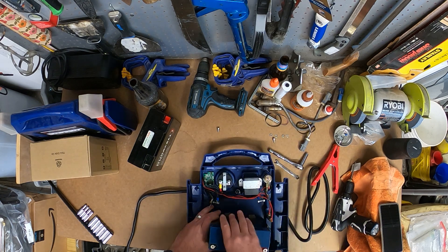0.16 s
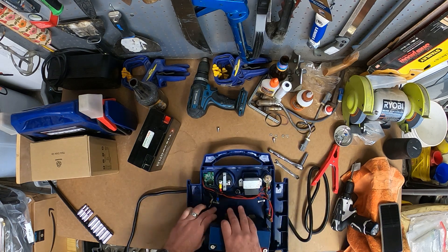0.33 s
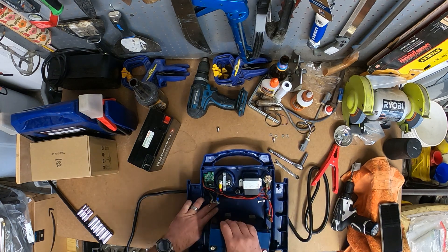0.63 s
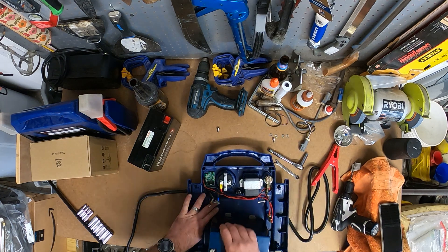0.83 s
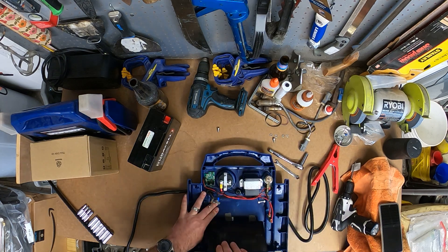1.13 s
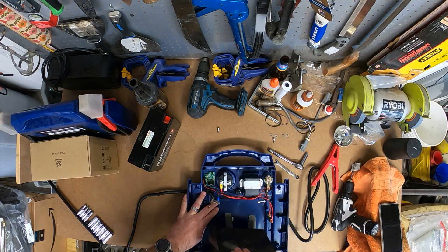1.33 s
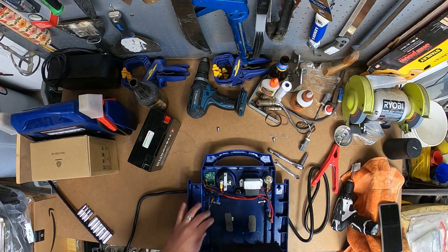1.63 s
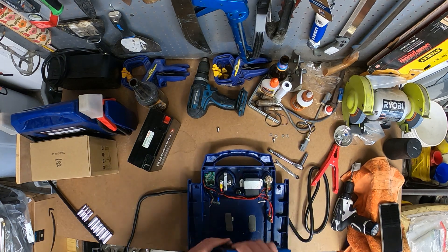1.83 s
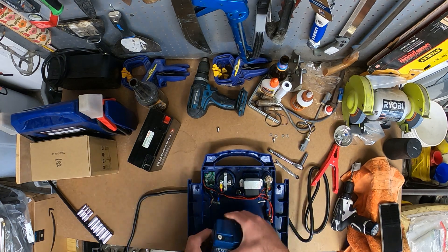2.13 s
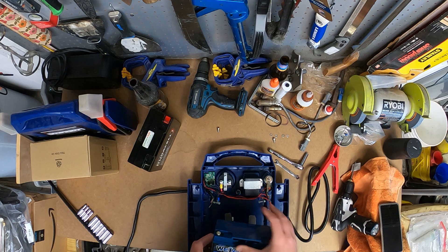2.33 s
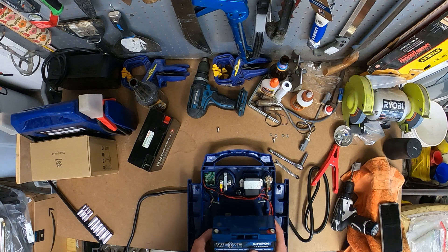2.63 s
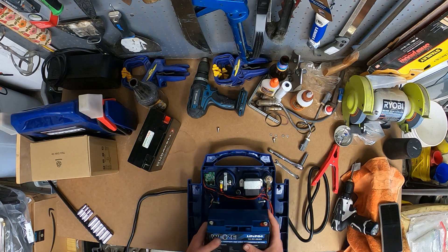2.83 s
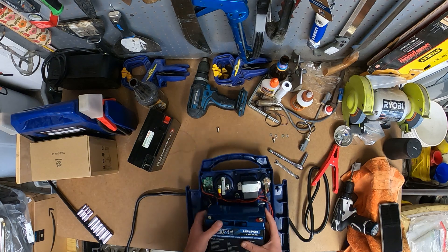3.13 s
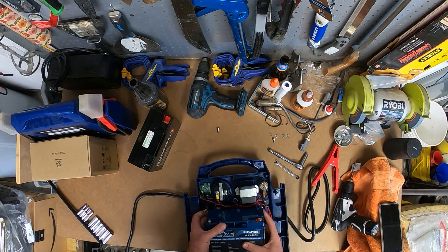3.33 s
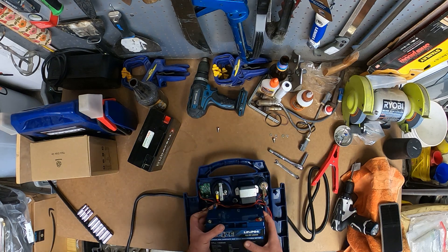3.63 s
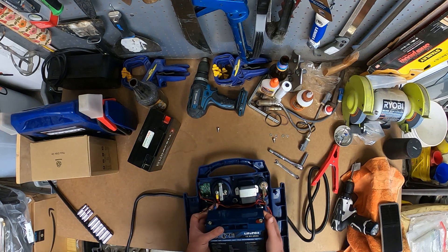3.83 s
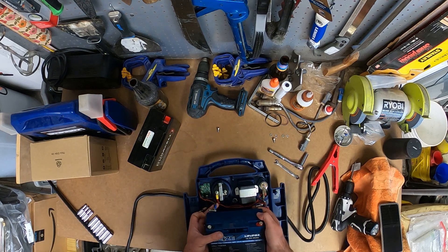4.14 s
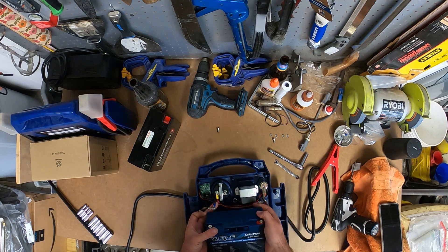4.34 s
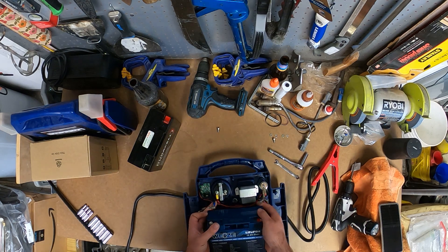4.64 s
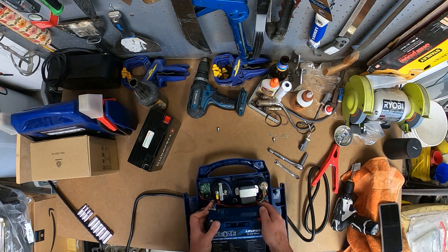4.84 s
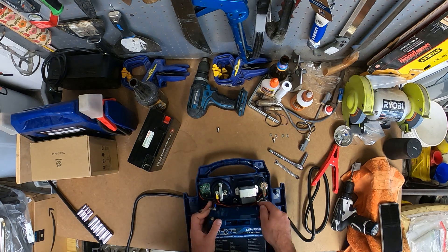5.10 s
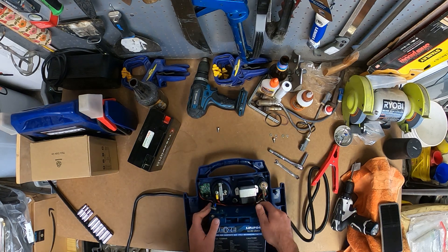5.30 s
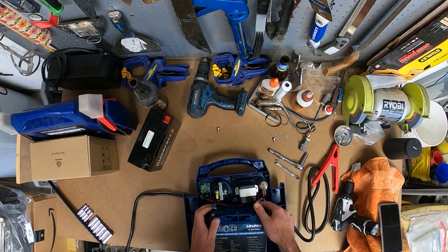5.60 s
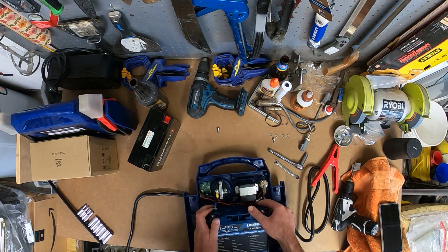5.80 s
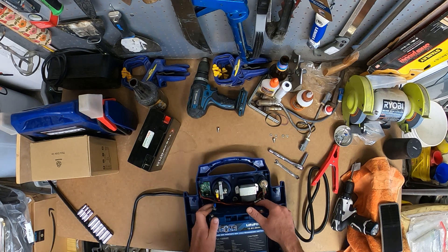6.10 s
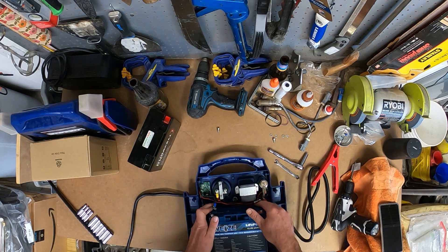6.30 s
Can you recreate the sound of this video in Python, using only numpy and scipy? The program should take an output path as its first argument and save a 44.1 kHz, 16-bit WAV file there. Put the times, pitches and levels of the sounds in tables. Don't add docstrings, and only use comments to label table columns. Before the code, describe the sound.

A close stereo camera microphone over a garage workbench, with very faint room tone and a short, small echo. Fingers pat and rub a hollow plastic case, scuffing at about 0.15 s; a brief squeaky slide chirps near 0.38. Light taps at 0.65 lead into a thin creak and groan, then a very loud hard plastic snap at 0.93 with two quick bounces, a low bench thump and a rubbing tail to about 1.1. It falls quiet, with faint skin rubbing, small ticks and a weak drag around 2.1 to 2.3. At 3.0 the battery clunks, then knocks hard and hollow at 3.28, booming in the bench. Clicks and scuffs continue from 3.4 to 4.6, with a scrape and knock at 4.24. Small clips snap at 4.84 and, brighter, at 5.38 with a brief shiver. Soft fumbling leads to a knock at 5.97 and a last dull one at 6.41.

```python
import sys
import numpy as np
from scipy import signal
from scipy.fft import rfft, irfft, next_fast_len
from scipy.io import wavfile
from scipy.ndimage import map_coordinates

SR = 44100
rng = np.random.default_rng(int(sys.argv[2]) if len(sys.argv) > 2 else 0)


def materialize(psi):
    bounded = np.clip(np.atleast_2d(psi).T, -1, 1)
    quanta = np.round(bounded * 32767).astype(np.int16)
    wavfile.write(sys.argv[1], SR, quanta)


def natural_amplitude(level_db):
    exponent = np.asarray(level_db, float) / 20
    return 10 ** exponent


N = 284886

# [f/Hz, width/Hz, level/dB]
WALL_MODES = [(600, 600, -1.5), (866, 410, 5.5), (1290, 510, 4)]
# [f/Hz, width/Hz, level/dB]
RIB_MODES = [(1790, 740, 1), (2650, 1300, -1), (3342, 1200, -6.5), (4360, 950, -7)]
# [f/Hz, width/Hz, level/dB]
EDGE_MODES = [(5400, 210, -2.5), (7156, 2700, -3.5), (9500, 2200, -7.5), (13300, 3000, -9)]
# [f/Hz, width/Hz, level/dB]
HOLLOW_MODES = [(149.7, 12, -4.5), (215, 28, 1.5), (370, 44, -9.5), (594.5, 32, -9)]


def unit(x):
    return x / np.sqrt(np.mean(x ** 2) + 1e-20)


def peak(x):
    return x / np.abs(x).max()


def add(track, s, x):
    part = track[..., round(s * SR):][..., :x.shape[-1]]
    part += x[..., :part.shape[-1]]


def along(points, hz):
    f, v = np.transpose(points)
    return np.interp(np.log(hz + 1), np.log(f + 1), v)


def filtered(x, response):
    m = next_fast_len(x.shape[-1] + 2048, real=True)
    return irfft(rfft(x, m) * response(np.fft.rfftfreq(m, 1 / SR)), m)[..., :x.shape[-1]]


def body(modes):
    def response(f):
        total = 0
        for k, (c, w, db) in enumerate(modes):
            total = total + (-1) ** k * natural_amplitude(db) * 1j * f * w / (c * c - f * f + 1j * f * w)
        return total
    return response


def dense(modes):
    def response(f):
        power = 0
        for c, w, db in modes:
            power = power + natural_amplitude(2 * db) * ((f * w) ** 2 / ((c * c - f * f) ** 2 + (f * w) ** 2)) ** 2
        cepstrum = irfft(np.log(power + 1e-12) / 2)
        cepstrum[1:len(f) - 1] *= 2
        cepstrum[len(f):] = 0
        return np.exp(rfft(cepstrum))
    return response


def shaken(modes, spread_db):
    shifts = spread_db * rng.standard_normal(len(modes))
    return [(c, w, db + shift) for (c, w, db), shift in zip(modes, shifts)]


def widened(modes, by):
    return [(c, w * by, db) for c, w, db in modes]


def wobble(rate):
    return map_coordinates(rng.standard_normal(int(N * rate / SR) + 4), [np.arange(N) * rate / SR], order=1)


def gritty(grit_db, rate):
    strength = natural_amplitude(grit_db * (wobble(rate) + 0.4 * wobble(rate / 1.1)))
    return unit(strength * rng.standard_normal((2, N)))


def spread(pair):
    # [f/Hz, likeness/1]
    likeness = [(60, 0.95), (130, 0.82), (200, 0.65), (550, 0.16), (1650, 0.21), (4970, 0.54),
                (15000, 0.02)]

    def middle_and_side(hz):
        turn = np.arccos(np.clip(along(likeness, hz), -1, 1)) / 2
        return np.array([np.cos(turn), np.sin(turn)])
    mid, side = filtered(pair, middle_and_side)
    return np.array([mid + side, mid - side])


def contacts():
    # [t/s, peak/dB, f/Hz, treble/dB, wall/dB]
    catches = [
        (0.9319, -3.5, 2500, -10, -8),
        (0.952, -8.5, 3600, -16, -8),
        (0.9642, -6.5, 2810, -19, -10),
        (4.8405, -26, 3400, -2, -8),
        (5.3765, -23, 4300, -16, -9),
    ]
    # [t/s, peak/dB, f/Hz, treble/dB]
    ticks = [(0.0789, -41, 3430, -11), (0.643, -39.5, 2800, -10), (1.6187, -59.5, 3540, -6),
             (1.6734, -55.5, 1549, -7), (1.8943, -64.5, 4410, 1.5), (1.9487, -59, 1490, -14),
             (1.969, -56, 1934, -16), (2.813, -59.5, 4280, -12.5), (2.955, -49.5, 3500, -18),
             (3.309, -26, 1380, -41), (3.4749, -31.5, 1540, -13.5), (3.532, -29.5, 2600, -20),
             (3.5747, -40.5, 3080, -6.5), (3.7264, -42, 2350, -10), (3.881, -44.5, 2500, -28),
             (3.9597, -45, 2830, -20), (4.069, -56, 2120, 1.5), (4.304, -45, 2650, -13),
             (4.36, -49.5, 2920, -12), (4.4206, -51, 4570, -8), (4.842, -35, 3300, 2),
             (5.5883, -45.5, 4320, -33.5), (5.683, -46, 2740, -18.5), (5.8893, -38.5, 2980, -8),
             (5.964, -23, 2000, -23), (6.0459, -37, 1410, -19.5)]
    # [t/s, peak/dB, f/Hz, treble/dB, wall/dB]
    scuffs = [(0.1365, -41.5, 2400, -22, -15), (0.15, -37, 2500, -13, -3.5), (0.161, -34, 1740, -10, -4),
              (0.651, -36.5, 1790, -9, -1), (0.7707, -45.5, 1654, -16.5, -5), (2.0845, -51, 1830, -7.5, -9),
              (2.166, -48, 1505, -24.5, -23), (2.2467, -48, 1500, -4, -19), (3.0259, -29.5, 1416, -26, 1),
              (3.263, -25.5, 2600, -30, -1.5), (3.5982, -32.5, 2050, -19.5, -17),
              (4.121, -44, 2000, -23.5, -11), (4.2347, -34.5, 2000, -32, -1.5),
              (4.4344, -43.5, 2730, -9, -6.5), (4.7382, -37, 1790, -20, -5.5),
              (4.8767, -38, 2800, -5.5, -2), (4.9507, -45.5, 2630, -38.5, -2.5),
              (5.1505, -42, 1930, -9.5, -1), (5.3672, -32, 2600, -8, -1), (5.3785, -31, 3600, -8, -14),
              (6.107, -40.5, 1460, -19.5, -5.5)]
    # [t/s, peak/dB, treble/dB, wall/dB]
    taps = [(0.0542, -50.5, -24, 6), (2.676, -56.5, -6, 0.5), (2.982, -32, -30, 6.5),
            (3.056, -38.5, -13, 6), (3.279, -16.5, -42, 0), (3.613, -41, -20, 0.5),
            (3.915, -46, -33.5, 0.5), (4.5102, -58.5, -36.5, 16.5), (5.113, -50.5, -19.5, 6),
            (5.257, -48, -22.5, 4), (5.3348, -53.5, -6, 6.5), (5.7708, -61, -26.5, 17),
            (5.9196, -45, -26.5, 10.5), (6.1494, -47.5, -13, 0.5), (6.231, -53, -23, -1.5),
            (6.4129, -28.5, -35, 1)]
    tap_hz, tap_t60_s = 1660, 0.044
    rows = [row + (0.0135,) for row in catches]
    rows += [row + (-8, 0.038) for row in ticks]
    rows += [row + (0.077,) for row in scuffs]
    rows += [(s, db, tap_hz, treble_db, wall_db, tap_t60_s) for s, db, treble_db, wall_db in taps]
    return rows


def clicks():
    spot_db_per_octave = 5.5
    out, t = np.zeros((2, N)), np.arange(SR // 8) / SR
    for s, db, hz, treble_db, wall_db, t60 in contacts():
        t60 = np.clip(t60, .004, .2)
        noise = rng.standard_normal((6, len(t)))
        crack = natural_amplitude(-60 * t / t60) * (1 - np.exp(-t / (0.0079 * t60)))
        rattle = natural_amplitude(-60 * t / (4.2 * t60)) * (1 - t / t[-1])
        shared = crack * (noise[0] + 0.42 * noise[1:3])
        shared = shared + natural_amplitude(-8.5) * rattle * (noise[3] + 0.84 * noise[4:])
        treble = (crack + natural_amplitude(-18.5) * rattle) * (noise[3] + 0.6 * noise[4:])
        spot = [(c, w, g - spot_db_per_octave * abs(np.log2(c / hz))) for c, w, g in RIB_MODES]
        spot.append((hz, 0.19 * hz, 2.5))
        walls = peak(filtered(shared, dense(shaken(WALL_MODES, spread_db=1.5))))
        ribs = peak(filtered(shared, dense(shaken(spot, spread_db=1.5))))
        edges = peak(filtered(treble, dense(shaken(EDGE_MODES, spread_db=1.0))))
        add(out, s, natural_amplitude(db) * (ribs + natural_amplitude(wall_db + 1.5) * walls + natural_amplitude(treble_db + 3.0) * edges))
    return out


def pings():
    # [t/s, peak/dB, f/Hz, t60/s]
    snaps = [(0.9333, -6.5, 2690, 0.0085), (0.9345, -11, 1600, 0.014), (.9525, -17, 1900, 0.0073),
             (0.9373, -16.5, 3460, 0.011), (0.9642, -9, 2814, 0.0082), (.972, -22.5, 2100, 0.06),
             (.997, -28, 2830, 0.029), (1.021, -32, 3030, 0.027), (1.06, -40, 2800, 0.027),
             (1.078, -40, 1230, 0.043), (2.9826, -25, 1504, 0.015), (2.983, -35.5, 3240, .012),
             (2.993, -30.5, 1638, 0.071), (3.0258, -30, 1160, 0.018), (3.0556, -35.5, 900, 0.023),
             (3.0703, -39, 1574, .07), (3.1896, -50, 1140, 0.03), (3.2656, -38, 4260, .015),
             (3.2766, -18, 724, 0.013), (3.2786, -18, 3295, 0.014), (3.2873, -20, 1400, 0.023),
             (3.298, -26.5, 900, .03), (3.321, -29.5, 1375, 0.025), (3.4042, -45, 1740, 0.033),
             (3.4743, -32.5, 3260, 0.0087), (3.4745, -33, 1470, 0.03), (3.5332, -33.5, 2570, 0.0074),
             (3.6002, -31.5, 3180, 0.0068), (3.615, -33, 2960, 0.01), (3.6763, -47, 2340, 0.038),
             (3.711, -49.5, 1290, 0.043), (3.738, -49.5, 4560, .03), (4.204, -46, 1910, .03),
             (4.227, -45, 3270, 0.021), (4.237, -32.5, 2110, 0.016), (4.269, -49, 3600, .02),
             (4.287, -46, 3150, 0.018), (4.556, -53, 1783, 0.07), (4.604, -58, 2500, .02),
             (4.623, -57, 2880, 0.024), (5.377, -17.5, 3600, 0.0083)]
    # [t/s, peak/dB, f/Hz, t60/s]
    rings = [(.9325, -12.5, 5400, 0.0051), (.9318, -10, 800, 0.017), (.9322, -17.5, 8300, 0.0066),
             (.9322, -24, 12800, .003), (.934, -18, 4300, 0.0072), (.9525, -30, 4300, .008),
             (.965, -16, 4440, 0.0068), (.9655, -18.5, 1500, 0.014), (2.091, -48.5, 426, 0.027),
             (3.283, -22, 370.7, 0.13), (3.533, -37.5, 900, .02), (3.616, -42.5, 2074, 0.045),
             (4.545, -50, 294, 0.073), (4.538, -48, 634, .06), (4.56, -49, 547, 0.058),
             (4.238, -36.5, 604, 0.034), (3.533, -45, 1505, 0.034), (3.534, -45, 4400, 0.011),
             (3.475, -41, 5020, 0.01), (3.616, -39, 1294, 0.04), (4.358, -57.5, 4660, 0.13),
             (.934, -20, 560, .05), (4.8408, -25.5, 3290, 0.02), (4.8412, -28.5, 4350, 0.0097),
             (4.841, -37.5, 6730, 0.029), (5.377, -28, 882, 0.054), (5.377, -31, 2710, 0.068),
             (5.3775, -22.5, 4440, 0.017), (5.379, -39, 347, 0.11), (5.267, -40, 1750, 0.027),
             (5.4, -42, 433, 0.051), (5.46, -49.5, 886, 0.064), (5.468, -53.5, 3600, .04),
             (5.68, -51.5, 660, 0.096), (5.753, -50, 2100, 0.034), (5.772, -44.5, 1190, 0.064),
             (5.966, -38, 580, 0.038), (5.966, -32, 1790, 0.052), (6.125, -46, 1152, 0.11),
             (6.4135, -25, 686, 0.022), (6.414, -33, 2970, 0.018), (6.4145, -42, 4600, 0.015),
             (6.417, -31.5, 1457, 0.035), (6.437, -41, 2020, 0.043)]
    # [t/s, peak/dB]
    bay = [(4.142, -45), (4.209, -41.5), (4.236, -36), (4.27, -41.5), (4.508, -52), (4.537, -44.5),
           (4.732, -46.5), (4.755, -52), (4.84, -41), (4.879, -39.5), (4.956, -49), (5.117, -50),
           (5.155, -47.5), (5.213, -49), (5.27, -52.5)]
    # [t/s, peak/dB]
    slips = [(0.354, -47), (0.3612, -44), (0.369, -30), (0.3735, -26), (0.3772, -22), (0.3836, -23),
             (0.3909, -25.5), (0.3966, -31), (0.4037, -46), (0.4123, -44), (0.421, -43), (0.4302, -40)]
    # [ratio to the pitch/1, level/dB]
    overtones = [(1, 2), (1.08, -3.5), (1.37, -8), (1.8, -9.5), (2.45, -15)]
    bay_hz, bay_t60_s = 1045.7, 0.091
    slip_hz, slip_t60_s = 2480, 0.034
    hard_rise_s, soft_rise_s = 0.00033, 0.00069
    out, t = np.zeros((2, N)), np.arange(SR // 12) / SR
    soft = [row + (bay_hz, bay_t60_s) for row in bay] + [row + (slip_hz, slip_t60_s) for row in slips]
    ratio, level_db = np.transpose(overtones)[:, :, None]
    sides = 1 + 0.24 * np.array([[1], [-1]]) * (-1) ** np.arange(len(overtones))
    groups = [(soft, soft_rise_s, -3), (snaps, hard_rise_s, 0.0), (rings, soft_rise_s, -14)]
    for rows, rise_s, upper_db in groups:
        start_db = level_db + upper_db * (ratio > ratio[0])
        for s, db, hz, t60 in rows:
            fade_db = start_db - 60 * t * np.sqrt(ratio) / np.clip(t60, .004, .15)
            audible = hz * ratio < SR / 2
            modes = natural_amplitude(fade_db) * audible * np.sin(2 * np.pi * hz * ratio * t)
            add(out, s, natural_amplitude(db) * peak(sides @ modes * (1 - np.exp(-t / rise_s))))
    return out


def thuds():
    # [t/s, peak/dB, f/Hz, t60/s]
    landings = [(0.055, -34, 215, 0.21), (0.663, -36.5, 130.8, 0.18), (0.9315, -17, 154.4, 0.075),
                (0.95, -16, 240.1, 0.047), (0.963, -15, 178.6, 0.027), (0.979, -20, 215, 0.069),
                (1.019, -33, 129, 0.072), (2.9863, -20.5, 258, 0.0233), (2.985, -31.5, 1720, 0.069),
                (2.999, -20, 216, 0.11), (3.022, -35.5, 383, 0.14), (3.053, -25, 151, 0.029),
                (3.205, -39, 247.7, 0.14), (3.262, -20, 233, 0.023), (3.279, -15, 123.2, 0.094),
                (3.291, -18.5, 134.3, 0.081), (3.31, -19, 220.5, 0.079), (4.241, -30.5, 244, 0.11),
                (5.372, -33, 782, 0.17), (5.968, -27.5, 555, 0.078), (6.418, -25.5, 155.2, 0.035),
                (6.431, -30, 330.3, 0.04)]
    # [t/s, peak/dB, f/Hz]
    pats = [(0.092, -49, 355), (0.436, -49, 230), (0.637, -46, 129), (0.782, -50, 161.7),
            (1.499, -59.5, 155), (2.092, -44, 230), (2.246, -51, 224.7), (2.678, -51, 235.7),
            (2.815, -59.5, 215), (2.96, -45, 240), (3.598, -47.5, 221.5), (3.913, -44.5, 592),
            (4.002, -40.5, 215), (4.536, -48, 283), (5.266, -36.5, 215), (5.687, -51.5, 143.5),
            (5.887, -41, 230), (5.917, -46, 149.7), (6.402, -41, 155.8)]
    # [t/s, peak/dB]
    knocks = [
        (0.9328, -24.5),
        (3.278, -12.5),
        (5.965, -40),
        (6.415, -22.5),
    ]
    pat_t60_s, knock_hz, knock_t60_s = 0.066, 586.7, 0.049
    out, t = np.zeros(N), np.arange(SR // 5) / SR
    blows = landings + [row + (pat_t60_s,) for row in pats] + [row + (knock_hz, knock_t60_s) for row in knocks]
    for s, db, hz, t60 in blows:
        push = np.sign(rng.normal()) * t * np.exp(-t / 0.0002)
        width = np.log(1000) / np.pi / np.clip(t60, .01, .4)
        modes = sorted(shaken(HOLLOW_MODES, spread_db=4.0) + [(hz, width, 6)])
        add(out, s, natural_amplitude(db) * peak(filtered(push, body(modes))))
    return out


def booms():
    # [t/s, peak/dB, t60/s]
    flexes = [(0.093, -42, 0.15), (0.651, -33, 0.16), (0.779, -47, 0.2), (0.934, -20, 0.17),
              (0.961, -13, 0.12), (2.982, -26, 0.24), (3.027, -22, 0.31), (3.202, -33.5, 1),
              (3.264, -19, 0.26), (3.401, -32, 0.46), (5.703, -39.5, 0.48), (5.892, -40, 0.29),
              (5.925, -33, 0.19), (5.969, -23.5, 0.31), (6.108, -36.5, 0.41), (6.412, -32, 0.34)]
    # [t/s, peak/dB, f/Hz, t60/s]
    rocks = [(0.43, -45, 91.4, 0.093), (0.999, -25, 64.4, 0.19), (1.077, -33.5, 50, 0.39),
             (2.821, -52, 34.8, 0.37), (3.93, -48, 48, 0.3), (4.243, -50, 88.4, 0.23),
             (4.535, -39, 47.35, 0.21), (4.556, -38.5, 60.4, 0.12), (4.605, -46, 45.6, 0.27),
             (.125, -42, 70, 0.14), (.7, -39, 76.5, 0.11), (5.281, -46.5, 39, 0.8),
             (5.379, -40.5, 31.8, 0.3)]
    bench_hz = 62.5
    out, t = np.zeros(N), np.arange(SR // 2) / SR
    for s, db, hz, t60 in [(s, db, bench_hz, t60) for s, db, t60 in flexes] + rocks:
        upper = .4 * np.sin(2 * np.pi * 1.45 * hz * t) * natural_amplitude(-60 * t / 0.6)
        swing = np.sin(2 * np.pi * hz * t) + upper
        envelope = natural_amplitude(-60 * t / np.clip(t60, .05, .9)) * (1 - np.exp(-t / 0.0076))
        add(out, s, natural_amplitude(db) * peak(swing * envelope))
    return out


def stroke(rows, modes):
    s, db = np.transpose(rows)
    out, span = np.zeros((2, N)), np.arange(round(s[0] * SR), round(s[-1] * SR))
    singing = unit(filtered(gritty(grit_db=2.5, rate=360)[:, span], body(modes)))
    add(out, s[0], natural_amplitude(np.interp(span / SR, s, db)) * singing)
    return out


def slide():
    # [t/s, level/dB]
    squeak = [
        (.285, -59.5),
        (.363, -43),
        (.376, -29),
        (.39, -32.5),
        (.412, -49),
        (.47, -59),
        (.56, -69),
    ]
    # [f/Hz, width/Hz, level/dB]
    squeak_modes = [(371, 90, -7), (1180, 510, -10.5), (1600, 114.8, -0.5), (2500, 300, -0.5),
                    (4350, 600, -8), (5950, 620, -12), (7030, 600, -11.5), (8300, 2100, -21)]
    # [t/s, level/dB]
    groan = [
        (0.9, -59),
        (0.92, -39.5),
        (0.9315, -30),
    ]
    shiver = [
        (5.38, -31.5),
        (5.41, -50.5),
        (5.46, -54),
        (5.5, -61),
        (5.54, -71),
    ]
    groan_modes = [(800, 110, -1), (3600, 900, -30)]
    shiver_modes = [(900, 280, 3.0), (2800, 700, 0), (3790, 450, 1), (4600, 500, 0), (7600, 1500, -8)]
    return spread(stroke(squeak, squeak_modes) + stroke(groan, groan_modes) + stroke(shiver, shiver_modes))


def creeps():
    # [t/s, level/dB]
    creep = [
        (.5, -72),
        (.68, -65),
        (.8, -62),
        (.87, -64.5),
        (.925, -56),
    ]
    # [f/Hz, width/Hz, level/dB]
    creep_modes = [(1600, 50, 0), (4230, 50, 3), (7880, 100, -6.5), (9700, 160, -5), (11500, 2500, -9)]
    # [t/s, level/dB]
    drag = [
        (2.163, -65.5),
        (2.168, -61),
        (2.225, -65.5),
        (2.247, -53),
        (2.257, -55),
        (2.266, -51.5),
        (2.277, -69),
        (2.5, -71.5),
        (2.52, -81),
    ]
    # [f/Hz, width/Hz, level/dB]
    drag_modes = [(2027, 150, 3), (3320, 290, 1), (4640, 200, -0.5), (8100, 530, -17), (11600, 3500, -14.5)]
    return spread(stroke(creep, creep_modes) + stroke(drag, drag_modes))


def swells(rest_db, rows):
    drop_db, roundness = 10, 1.6
    t = np.arange(-SR // 2, SR // 2) / SR
    padded = np.pad(natural_amplitude(rest_db), (SR // 2, 0))
    for s, half_s, db in rows:
        add(padded, s, natural_amplitude(db - drop_db * np.abs(t / half_s) ** roundness))
    return padded[SR // 2:]


def hands():
    # [t/s, sliding/dB, pressure/dB, bare skin/dB]
    grip = [(0, -68.5, -60, -10), (.26, -57.5, -54, -13.5), (.46, -60, -58.5, -9), (.85, -76, -61.5, -1),
            (1.22, -71.5, -57.5, -15), (1.46, -74.5, -70, -13), (1.83, -97.5, -86, -1),
            (2.1, -79, -69.5, -4), (2.549, -76.5, -67.5, -8), (2.8, -81.5, -69.5, -1),
            (2.97, -67, -62, -4.5), (3.64, -64.5, -56.5, -12), (3.96, -64, -53.5, -16),
            (4.5, -63, -56.5, -19.5), (5.099, -62.5, -56.5, -17.5), (5.65, -72, -59.5, -10),
            (6.1, -67, -56.5, -19), (6.46, -67, -63, -10.5)]
    # [peak t/s, half length/s, rub/dB, skin over rub/dB, hollow over rub/dB]
    strokes = [(0.14, 0.059, -55.5, -4.5, 6), (0.718, 0.099, -62, -8.5, 5.5),
               (1.038, 0.11, -40.5, -15.5, 1.5), (1.388, 0.038, -59.5, -6.5, -6),
               (1.618, 0.14, -76, -6, -1), (2.121, 0.07, -85.5, -15.5, 17.5),
               (2.227, 0.046, -62, -11.5, -2.5), (2.375, 0.15, -75.5, 6, -6), (2.68, 0.064, -72, -15, 4.5),
               (3.283, 0.071, -36, -20.5, 0), (3.41, 0.11, -49.5, -14.5, 6.5),
               (4.226, 0.058, -59.5, -28, 6), (4.551, 0.096, -90, -40.5, 19),
               (5.26, 0.04, -62, -12.5, 17.5), (5.833, 0.13, -52.5, -13, 6), (5.988, 0.02, -77, -12, 17)]
    # [peak t/s, half length/s, level/dB]
    lurches = [
        (1.088, 0.045, -37.5),
        (1.254, .1, -58),
        (2.824, 0.054, -60.5),
        (3.149, 0.028, -43),
        (3.293, 0.069, -36.5),
        (5.317, 0.1, -55),
        (5.974, 0.19, -51),
    ]
    # [f/Hz, width/Hz, level/dB]
    bench_modes = [(39.43, 28, -2.5), (58, 15, -6), (88, 6.3, -5), (129, 45, -4)]
    s, *controls = np.transpose(grip)
    slide_db, press_db, skin_db = [np.interp(np.arange(N) / SR, s, c) for c in controls]
    at, half_s, rub_db, hiss_db, hollow_db = np.transpose(strokes)

    def rubbed(modes, by, grit_db, rate):
        return unit(filtered(gritty(grit_db, rate), dense(widened(modes, by))))
    rub_modes = [(c, w, db - 3) for c, w, db in WALL_MODES[1:]] + RIB_MODES
    rub = swells(slide_db, zip(at, half_s, rub_db))
    rub = rub * rubbed(rub_modes, 0.99, grit_db=3.5, rate=40)
    hiss = swells(slide_db + skin_db + 2.0, zip(at, half_s, rub_db + hiss_db - 0.5))
    hiss = hiss * rubbed(RIB_MODES[3:] + EDGE_MODES, 1.8, grit_db=2.0, rate=410)
    murmur = swells(press_db - 9.0, zip(at, half_s, rub_db + hollow_db - 4.5))
    murmur = murmur * rubbed(HOLLOW_MODES, 2.9, grit_db=4.5, rate=30)
    sway = swells(press_db - 6.0, lurches) * rubbed(bench_modes, 1.5, grit_db=4.0, rate=7.2)
    return spread(rub + hiss + murmur + sway)


def garage(x):
    # [f/Hz, t60/s]
    ring_times = [(100, 0.37), (1000, 0.16), (4000, 0.063), (10000, 0.17)]
    out, step = np.zeros((2, N)), SR // 3
    for start in range(0, N, step):
        hz, t, z = signal.stft(rng.standard_normal((2, SR // 3)), SR, nperseg=256)
        fade = (1 - np.exp(-t / 0.0035)) * natural_amplitude(-60 * t / along(ring_times, hz)[:, None])
        tail = signal.istft(z * fade, SR, nperseg=256)[1]
        wet = signal.fftconvolve(x[None, start:start + step], tail / np.linalg.norm(tail[0]), axes=1)
        add(out, start / SR + .006, wet)
    return spread(out)


def room_tone():
    # [f/Hz, level/dB per Hz]
    colour = [(15, -29.5), (25, 9), (107, -8.5), (240, -4), (420, -26.5), (782, -19), (3530, -27),
              (15500, -42.5)]
    noise = filtered(rng.standard_normal((2, N)), lambda hz: natural_amplitude(along(colour, hz)))
    return natural_amplitude(-69.5) * spread(unit(noise))


def scene():
    sharp, heavy = clicks() + slide() + pings(), thuds()
    echo = garage(natural_amplitude(-7.0) * sharp.mean(axis=0) + natural_amplitude(-20.5) * heavy)
    near = sharp + heavy + booms() + hands()
    return near + echo + room_tone() + creeps()


def roll_off(x):
    return signal.sosfilt(signal.butter(12, 15770, fs=SR, output="sos"), x)


def record(dry):
    # [f/Hz, level/dB]
    microphone = [(25, -2.5), (100, 0.1), (9000, 1.46), (10800, -8.5), (12500, -14), (15500, -16)]
    # [f/Hz, level/dB]
    lean = [(100, -0.5), (300, -2), (1000, 0.5), (5000, -1.76), (6500, -3), (9500, -1), (13000, 4)]
    # [f/Hz, phase/rad]
    lag = [(1500, 0.01), (6500, 0.12), (8200, 1.86), (12000, 1.8)]
    half = np.array([[.5], [-.5]])

    def openings(hz):
        level = natural_amplitude(along(microphone, hz) + half * along(lean, hz))
        return level * (hz < 15770) * np.exp(1j * half * along(lag, hz))
    return roll_off(filtered(dry, openings))


dry = scene()
out = record(dry)
materialize(out)
```